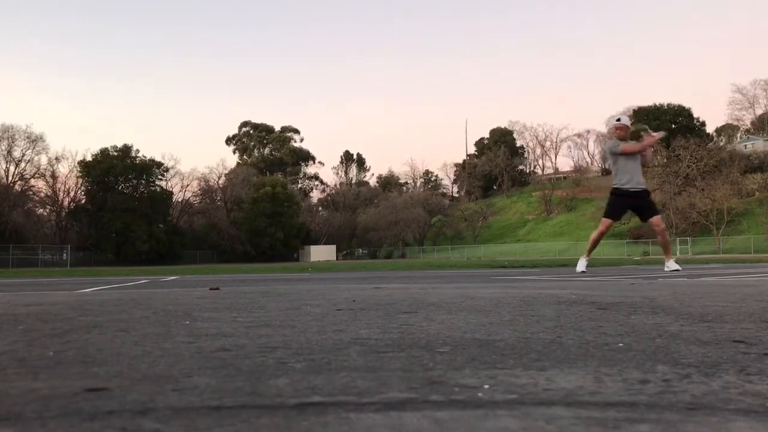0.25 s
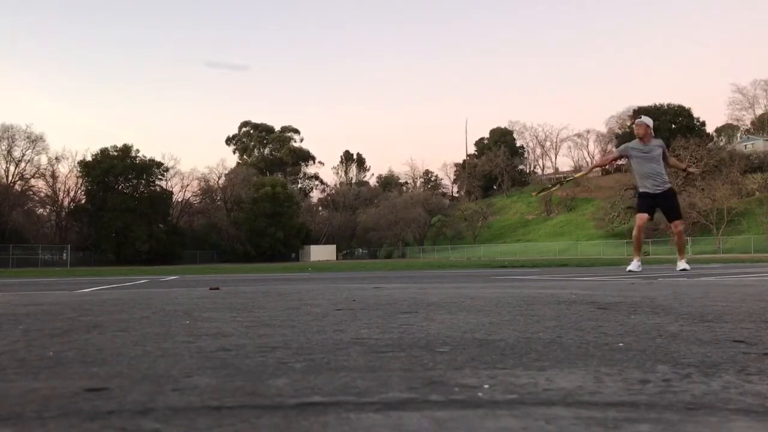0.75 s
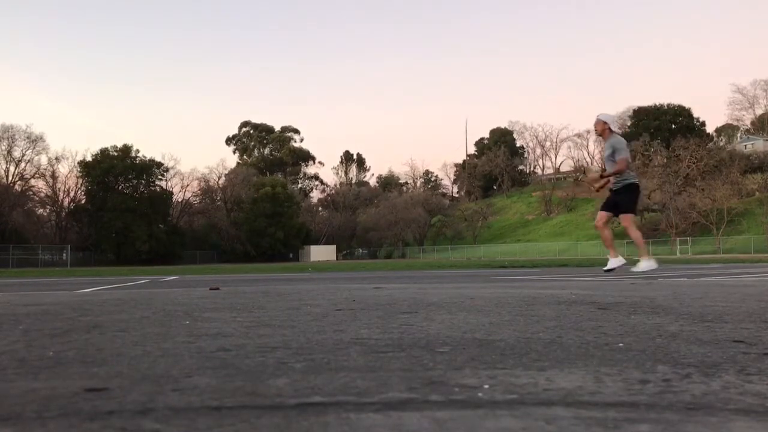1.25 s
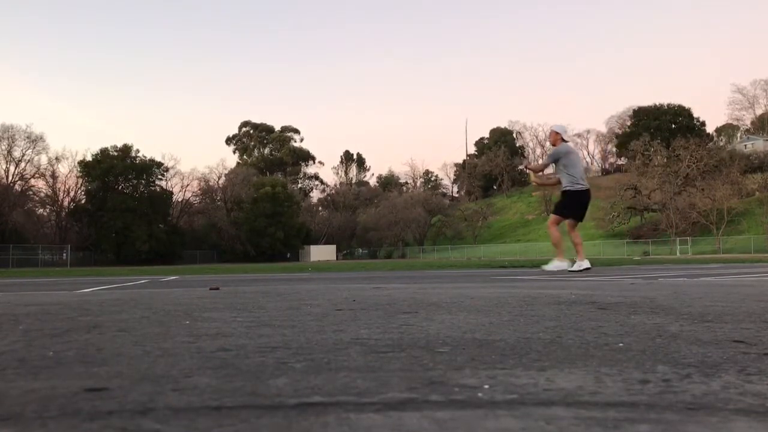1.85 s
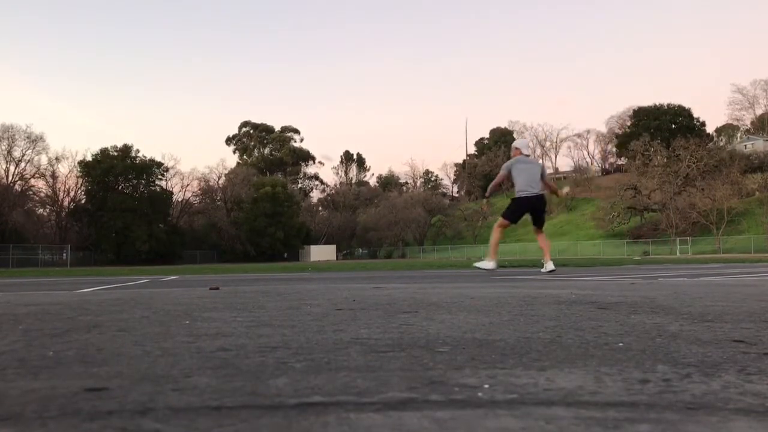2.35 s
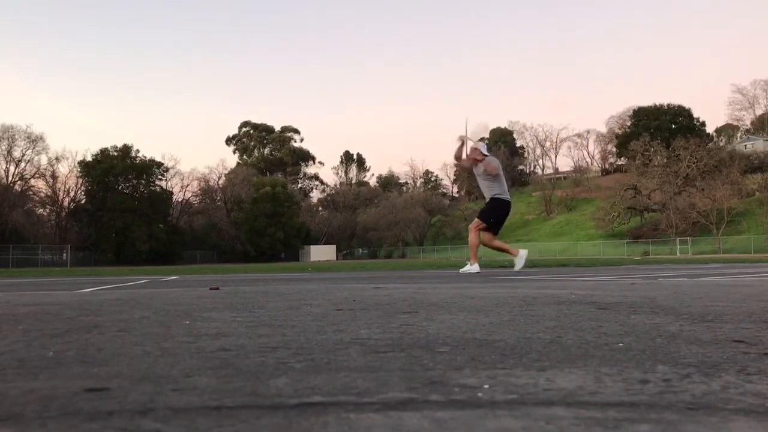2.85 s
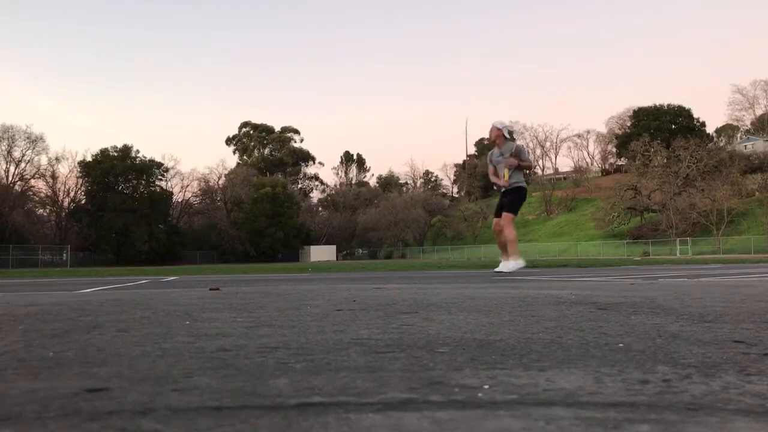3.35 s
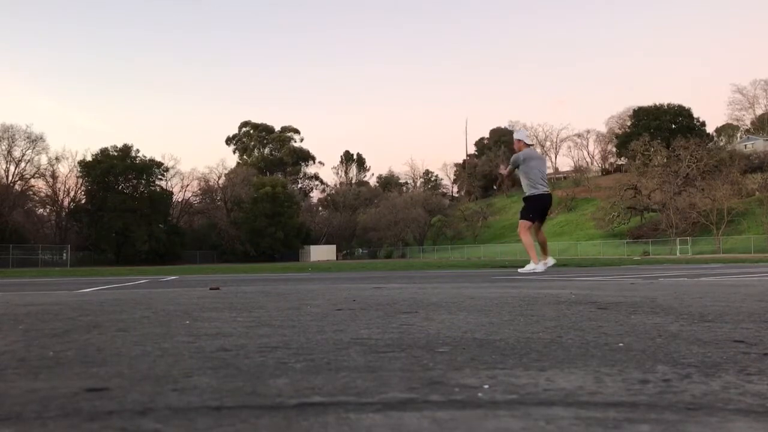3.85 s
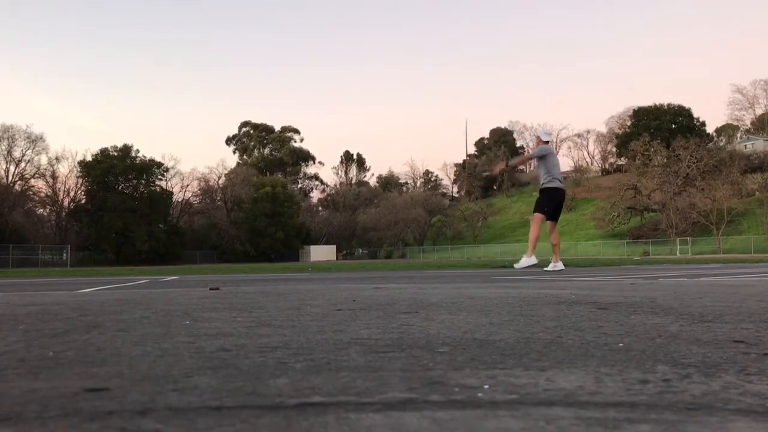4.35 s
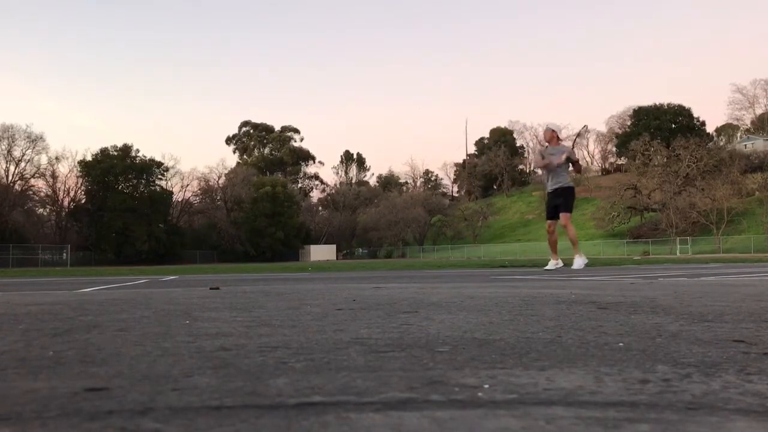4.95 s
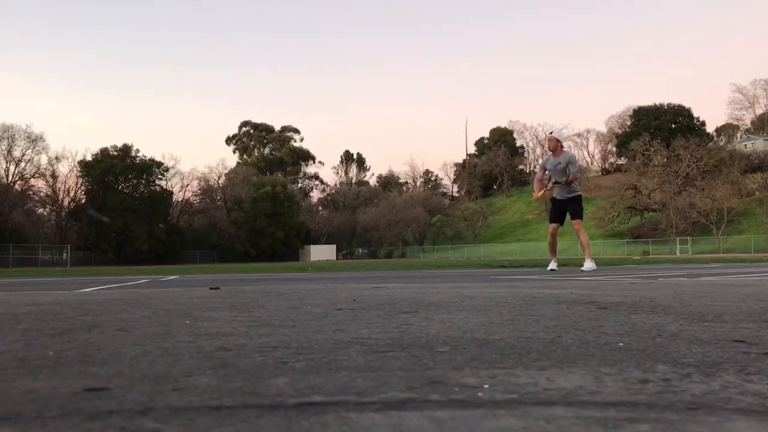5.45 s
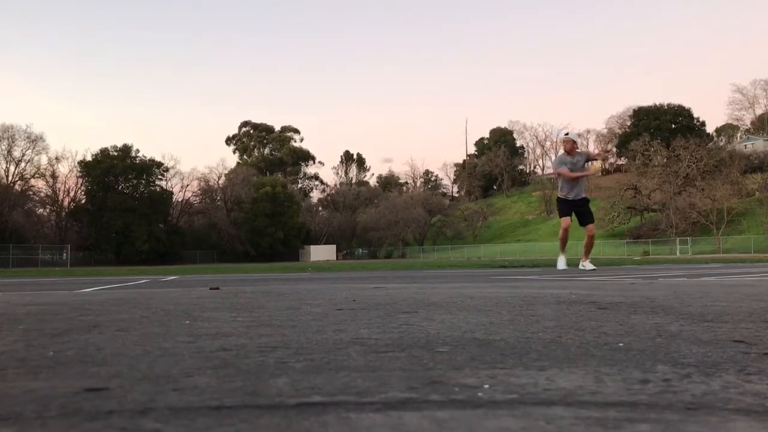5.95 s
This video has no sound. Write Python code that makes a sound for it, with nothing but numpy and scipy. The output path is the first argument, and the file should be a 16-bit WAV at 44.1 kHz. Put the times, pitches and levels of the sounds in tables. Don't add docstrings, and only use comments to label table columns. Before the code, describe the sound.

A quiet open-air court with low distant road drone, faintly stirring leaves and slight hiss, heard in mono from the ground near a practice wall. At 0.3 s a ball bounces crisply on asphalt; shoes scuff grit, and at 0.63 s a racket hits with a bright string crackle and soft hollow pock. At 1.3 s the ball slams the hollow wall: a hard crack, deep falling thump, ringing panel, rumble and fence slaps. It bounces at 1.75 s with a quick slap, then light steps follow. The loudest stroke comes at 2.76 s, and the brightest, loudest wall boom at 3.23 s, tight and knocky. Soles drag; a faint bounce at 4.0 s, a duller hollow stroke at 4.5 s, then a darker, boomy wall hit at 5.04 s. Rumble fades before a clear bounce at 5.68 s and final gritty scuffs around 5.9 and 6.15 s.

```python
import sys
import numpy as np
from scipy import signal
from scipy.io import wavfile
from scipy.ndimage import uniform_filter1d

SR = 44100
rng = np.random.default_rng(int(sys.argv[2]) if len(sys.argv) > 2 else 0)


def voltage_ratio(decibels):
    exponent = np.asarray(decibels, float) / 20
    return 10 ** exponent


def inscribe(sig):
    pcm = np.round(np.clip(np.atleast_2d(sig).T, -1, 1) * 32767)
    wavfile.write(sys.argv[1], SR, pcm.astype(np.int16))


N = 273283


def evened(x):
    return x / np.sqrt(np.mean(x ** 2) + 1e-20)


def read(points, hz):
    f, value = np.transpose(points)
    return np.interp(np.log(hz + 1), np.log(f + 1), value)


def add(mix, s, sound):
    part = mix[round(s * SR):][:len(sound)]
    part += sound[:len(part)]


def lowpass(x, top_hz, order=2):
    return signal.lfilter(*signal.butter(order, top_hz, fs=SR), x)


def resonate(x, hz, width):
    return signal.lfilter(*signal.iirpeak(hz, hz / width, SR), x)


def ring(t, hz, db, t60, rise=0.0003):
    t = np.maximum(t, 0)
    return voltage_ratio(db - 60 * t / t60) * (1 - np.exp(-t / rise)) * np.sin(2 * np.pi * hz * t)


def tick(t, hz, db, length):
    puff = rng.standard_normal(len(t)) * np.exp(-t / length)
    puff[0] -= 3.0
    coloured = resonate(puff, hz, 0.9 * hz)
    return voltage_ratio(db) * coloured / abs(coloured).max()


def noise(length, db_of, size=512):
    hop = size // 4
    frames = length // hop + 6
    hz = np.fft.rfftfreq(size, 1 / SR)[:, None]
    a, b = rng.standard_normal((frames, len(hz), 2)).T
    z = (a + 1j * b) * voltage_ratio(db_of(hz, np.arange(frames) * hop / SR))
    return signal.istft(z, nperseg=size, noverlap=size - hop)[1][:length]


def echoed(x, echoes):
    out = x.copy()
    for delay, db, top_hz in echoes:
        add(out, delay, voltage_ratio(db) * lowpass(x, top_hz))
    return out


def trees(t):
    rest_db, earlier_hit_db = -20.5, 9.5
    rise_s, fall_db_per_s = 0.11, 34
    power = voltage_ratio(rest_db) ** 2 + voltage_ratio(earlier_hit_db - fall_db_per_s * t) ** 2
    for rows, db in (WALL_HITS, 24), (STROKES, 2.5), (BOUNCES, -3.5):
        for s, *_ in rows:
            after = np.maximum(t - s, 0)
            swell = np.minimum(after / rise_s, 1)
            power = power + (voltage_ratio(db - fall_db_per_s * after) * swell) ** 2
    return 10 * np.log10(power)


# f/Hz, level/dB per Hz
ROAD = [(25, -14.5), (55, -0.5), (85, -2), (125, 0), (180, -8), (260, -8.5), (420, -18), (650, -14.5),
        (1000, -11.5), (1400, -13), (1750, -22), (2100, -29), (2700, -38.5), (4000, -48.5), (7000, -85.5)]
# t/s, level/dB
ROAD_LEVEL = [(0.0, -41.5), (2.5, -42.5), (4.4, -43), (6.2, -44.5)]


def road():
    patch_db, duck_db, duck_s = 1.6, 0.5, 0.265
    patches = rng.standard_normal((N // 512 + 6, 1025)).T
    patches = evened(uniform_filter1d(uniform_filter1d(patches, 12, 0), 8, 1))

    def colour(hz, t):
        air_loss = 12 * np.maximum(np.log2((hz + 1) / 7000), 0)
        leaves = np.exp(-np.log((hz + 1) / 4450.0) ** 2 / 0.3)
        return read(ROAD, hz) - air_loss + patch_db * patches + leaves * trees(t)

    hum = noise(N, colour, size=2048)
    t = np.arange(N) / SR
    sunk_db = sum(duck_db * (t > hit) * np.exp(-abs(t - hit) / duck_s) for hit, *_ in WALL_HITS)
    s, level_db = np.transpose(ROAD_LEVEL)
    return evened(hum) * voltage_ratio(np.interp(t, s, level_db) - sunk_db - 1.5)


# t/s, level/dB, colour f/Hz
TICKS = [(.023, -57, 4970), (.39, -43.5, 2580), (0.578, -33.5, 1000), (0.587, -32, 1290), (.705, -46, 5560),
         (.733, -34, 1050), (.772, -49, 5060), (.815, -43, 6650), (0.914, -56, 4500), (1.0875, -33.5, 1510),
         (1.13, -58, 5500), (1.3067, -24, 5130), (2.0145, -34, 1000), (3.812, -38, 289), (3.81, -46, 2560),
         (3.661, -35, 1100), (1.345, -46.5, 5500), (1.198, -61, 6000), (3.695, -56, 8500),
         (4.529, -50, 7000), (2.396, -59, 5460), (2.795, -68, 10000), (3.039, -47, 3200),
         (3.237, -30, 4500), (4.161, -59.5, 4950), (4.222, -34, 9600), (4.224, -33.5, 8900),
         (4.64, -59, 6000), (5.0465, -39, 6000), (6.0, -58, 6860)]


def knock(db, hz):
    t = np.arange(SR // 20) / SR
    body = resonate(tick(t, hz, 0, 2.5 / hz), hz, 0.7 * hz)
    body = lowpass(body, min(1.3 * hz, 16000), order=4)
    return voltage_ratio(db + 1.5) * body / abs(body).max()


# f/Hz, level/dB per Hz
SOLE = [(1000, 15.5), (2000, 13.5), (3000, 11.5), (4200, 17), (6500, 13.5), (10000, 4.5), (13000, 9.5),
        (16000, 1.5)]


def scuff(length_s, shape_db, treble_db):
    grip_s, release_s = 0.003, 0.011
    length = round(length_s * SR)

    def colour(hz, t):
        treble = np.clip(np.log2((hz + 1) / 3260.0) / 0.82, 0, 1)
        return read(SOLE, hz) + treble * treble_db + 0 * t

    grit = noise(length, colour, size=256)
    grains = voltage_ratio(2.0 * evened(uniform_filter1d(rng.standard_normal(length), 60)))
    grains *= voltage_ratio(1.6 * evened(uniform_filter1d(rng.standard_normal(length), 350)))
    t = np.arange(length) / SR
    edges = np.minimum(t / grip_s, 1) * np.minimum(t[::-1] / release_s, 1) ** 2
    return evened(grit * grains) * voltage_ratio(shape_db(np.arange(length) / length)) * edges


# centre t/s,
# length t/s, level/dB, treble level/dB against it
STEPS = [(0.257, 0.028, -69, 0), (0.447, 0.061, -72, 10), (0.808, 0.046, -57.5, -4),
         (0.909, 0.14, -60, -16.5), (1.025, 0.24, -65, -18), (4.932, 0.31, -66.5, -16),
         (3.658, 0.054, -58, -21), (1.596, 0.041, -60, 6), (2.073, 0.036, -65, 1), (2.173, 0.06, -62, -8),
         (2.301, .02, -50.5, -2), (2.523, 0.039, -56, -1), (2.617, 0.035, -73, 0), (2.907, 0.05, -72, 8),
         (3.171, 0.13, -58.5, -9.5), (4.015, 0.037, -60, -2), (4.66, 0.046, -62, -3),
         (4.697, .025, -63, -9), (4.737, 0.031, -52.5, 3), (6.149, 0.029, -46.5, 0.5)]


def step(centre, length_s, db, treble_db):
    arch_db = 15
    lean = 0.8
    span = 1.4 * length_s
    sound = scuff(span, lambda u: db - 2 * arch_db * (2 * u ** lean - 1) ** 2, treble_db)
    return centre - span * 0.5 ** (1 / lean), sound


# t/s, tick level/dB, ring level/dB, ring f/Hz, thud level/dB
BOUNCES = [
    (0.2912, -19, -28.5, 1000, -31),
    (1.7455, -25.5, -30.5, 1000, -31),
    (1.7599, -33, -34, 1000, -38),
    (4.0118, -29, -32, 1000, -38.5),
    (4.037, -40, -37, 1000, -60),
    (5.6785, -25.5, -25.5, 1036, -33),
    (5.6999, -36, -42, 990, -52),
]


def bounce(tick_db, ring_db, ring_hz, thud_db):
    t = np.arange(SR // 8) / SR
    thud = voltage_ratio(thud_db) * np.sin(2 * np.pi * 260 * t) * np.exp(-((t - 0.004) / 0.0033) ** 2)
    felt = tick(t, 1700, tick_db - 24.5, 0.0022) + tick(t, 1100, tick_db + 0.54, 0.00015)
    ball = ring(t, ring_hz, ring_db, 0.025)
    wire = ring(t - 0.015, 4250, tick_db - 45, 0.19, 0.005)
    return lowpass(felt, 6500) + ball + thud + wire


# start t/s, length t/s, first level/dB, last level/dB, treble level/dB against it
DRAGS = [(.516, 0.13, -57.5, -43, -2), (0.627, 0.099, -44, -78, -8), (0.701, 0.054, -50, -79, 1),
         (1.358, .046, -48, -37, -9), (3.033, 0.086, -53.5, -63.5, -2), (3.493, 0.063, -54, -53.5, 2),
         (3.551, 0.094, -62, -71, 1), (4.213, 0.19, -53.5, -50.5, 2), (4.762, 0.085, -60, -66.5, 2),
         (5.636, 0.051, -54, -68, -14), (5.87, 0.045, -68.5, -51.5, -2.5)]


def drag(start, length_s, first_db, last_db, treble_db):
    return start, scuff(length_s, lambda u: first_db + (last_db - first_db) * u, treble_db)


def swish(contact_s, ball_db):
    length_s, rise_db, top_db = 0.065, 21, ball_db - 38
    return drag(contact_s - length_s, length_s, top_db - rise_db, top_db, -10)


# t/s, string crack level/dB, ball ring level/dB, ball ring f/Hz, crack brightness level/dB
STROKES = [
    (0.6281, -34, -22.5, 1000, 34),
    (2.764, -29, -16, 1003, 19),
    (4.5004, -35.5, -17.5, 990, -2),
]
# f/Hz, width f/Hz, level/dB, share of brightness
STRING_CRACK = [(614, 450, 10.5, 0.74), (1120, 290, -1, 0.58), (1800, 63, 0, 0), (3600, 85, -10, 0.86),
                (4420, 440, -4.5, 1), (5500, 2900, -5, 0.74), (13200, 2300, -17, 0.75)]
# delay t/s, level/dB, top f/Hz
STROKE_ECHOES = [
    (0.0264, -15.5, 2500),
    (.092, -19.5, 1200),
]


def racket(crack_db, ball_db, ball_hz, bright_db):
    t = np.arange(SR // 4) / SR
    contact = rng.standard_normal(len(t)) * np.minimum(t / 0.0002, 1) * np.exp(-(t / 0.005) ** 2)
    crack = np.zeros(len(t))
    for hz, width, db, share in STRING_CRACK:
        string = resonate(resonate(contact, hz, width), hz, 2 * width)
        crack += voltage_ratio(db + share * bright_db) * evened(string)
    crack *= voltage_ratio(crack_db + 12.5) / abs(crack).max()

    push = voltage_ratio(-8.5 + 0.35 * crack_db) * np.sin(2 * np.pi * 270 * (t - 0.0012))
    push *= np.exp(-((t - 0.0036) / 0.0024) ** 2)

    ball = ring(t - 0.0045, ball_hz, ball_db + 12.0, 0.016, 0.0014)
    ball += ring(t - 0.0045, 0.85 * ball_hz, ball_db - 19, 0.014, 0.002)
    frame = ring(t - 0.001, 614, ball_db - 5 - 0.058 * bright_db ** 2, 0.022, 0.0011)

    string_db = ball_db - 23.5
    strings = ring(t, 2350, string_db, 0.13 - 0.0022 * bright_db)
    strings += ring(t, 2255, string_db - 8 + 0.42 * bright_db, 0.075)

    spill = evened(resonate(rng.standard_normal(len(t)), 1700, 3400))
    spill *= voltage_ratio(crack_db - 14.5 - 60 * t / 0.1)
    return echoed(crack + push + ball + frame + strings, STROKE_ECHOES) + lowpass(spill, 4700)


def wake(contact_s, ball_db):
    length_s, fall_db, first_db = 0.11, 7, ball_db - 42.5
    return drag(contact_s + 0.031, length_s, first_db, first_db - fall_db, -12)


# t/s, crack level/dB, crack colour f/Hz, thump level/dB, settled thump f/Hz
WALL_HITS = [
    (1.2999, -8.5, 5360, -7, 96),
    (3.2273, -7.5, 6880, -4.5, 143.6),
    (5.0384, -8, 4100, -5, 127),
]
# f/Hz, level/dB, t60 t/s
PANELS = [
    [(94.8, -21, 0.62), (132, -18, 0.22), (221, -28.5, 0.32), (250.3, -23, 0.24), (309, -28.5, 0.25),
     (367.5, -22.5, 0.14), (500, -26.5, 0.15), (796, -27.5, 0.09), (1000, -18, 0.015)],
    [(66, -24.5, 0.73), (158, -30.5, 0.11), (203, -22, 0.045), (258.6, -17.5, 0.27), (298, -19.5, 0.13),
     (380, -19, 0.05), (499, -16.5, 0.043), (650, -17, 0.0443), (838, -13, 0.036), (974, -16.5, 0.034),
     (2100, -29.5, 0.045)],
    [(76.7, -12, 0.27), (126, -16, 0.15), (179, -17.5, 0.2), (224, -16, 0.087), (355, -13.5, 0.044),
     (397, -23, 0.081), (507, -22.5, 0.084), (750, -19, 0.043), (1140, -9, 0.0078), (1720, -27, 0.014),
     (2490, -25, 0.053), (7100, -28, 0.01)],
]
# f/Hz, level/dB per Hz
BOOM = [(30, -33), (70, -1), (150, -0.5), (260, -9.5), (450, -16), (1000, -9), (2500, -30.5), (5000, -55.5),
        (9000, -46), (16000, -80)]
# f/Hz, t60 t/s
BOOM_DECAY = [(50, 1), (150, 1.42), (400, 0.66), (1200, 0.1), (4000, 0.67), (12000, 0.22)]
# delay t/s, level/dB, top f/Hz
WALL_ECHOES = [
    (0.0606, -12, 9000),
    (0.084, -24, 7100),
    (.115, -25, 493),
    (0.151, -34, 6000),
    (.181, -20.5, 5200),
    (0.244, -26.5, 500),
]


def wall(crack_db, crack_hz, thump_db, settle_hz, modes):
    t = np.arange(SR) / SR
    slap = ring(t, 2780, crack_db + 4.0, 0.0028, 0.00005)
    slap -= ring(t, crack_hz, crack_db + 9.5, 0.00075, 0.00005)
    slap += tick(t, 6880, crack_db - 4.5, 0.00035)
    crack = lowpass(slap, 8800, order=8)
    crack += ring(t - 0.0002, 1470, crack_db + 8.5, 0.0028, 0.0001)
    crack += tick(t, 13000, crack_db - 33.5, 0.002)

    ground = evened(resonate(rng.standard_normal(SR), 2000, 2800))
    chatter = evened(resonate(rng.standard_normal(SR), 1500, 2500))
    scatter = voltage_ratio(crack_db - 38.0 - 60 * t / 0.16) * ground
    scatter += voltage_ratio(crack_db - 26 - 60 * t / 0.089) * chatter

    after = np.maximum(t - 0.0011, 0)
    turns = settle_hz * after + 130 * 0.003 * (1 - np.exp(-after / 0.0013))
    thump = voltage_ratio(thump_db - 60 * after / 0.059) * np.sin(2 * np.pi * turns)

    panel = np.zeros(SR)
    for hz, db, t60 in modes:
        panel += ring(t - 0.0009 - 0.055 / hz, hz, db, t60, 0.37 / hz)

    rumble = noise(SR, lambda hz, s: read(BOOM, hz) - 60 * s / read(BOOM_DECAY, hz), size=1024)
    rumble *= voltage_ratio(thump_db - 11.5 - 11.0) / np.std(rumble[:SR // 10])
    rumble *= 1 - np.exp(-t / 0.0022)

    smear = rng.standard_normal(200) * np.exp(-t[:200] / 0.0018)
    smear /= np.linalg.norm(smear)
    blurred = voltage_ratio(-7.5) * signal.oaconvolve(crack + scatter, smear)[:SR]
    returned = echoed(blurred + thump, WALL_ECHOES) - blurred
    return returned + crack + scatter + panel + rumble


def scene():
    mix = road()
    for s, db, hz in TICKS:
        add(mix, s, knock(db, hz))
    for row in STEPS:
        add(mix, *step(*row))
    for s, *blow in BOUNCES:
        add(mix, s, bounce(*blow))
    for row in DRAGS:
        add(mix, *drag(*row))
    for s, *blow in STROKES:
        ball_db = blow[1]
        add(mix, *swish(s, ball_db))
        add(mix, s, racket(*blow))
        add(mix, *wake(s, ball_db))
    for (s, *blow), modes in zip(WALL_HITS, PANELS):
        add(mix, s, wall(*blow, modes))
    return mix[None]


def roll_off(x):
    return signal.sosfilt(signal.butter(12, 16630, fs=SR, output="sos"), x)


# f/Hz, level/dB per Hz
HISS = [(3000, 8), (6000, 3), (9000, -1.5), (10500, -3.5), (12000, 1.5), (15500, -3), (16000, -29)]


def record(dry):
    lost_hz, lost_top_db = (2570, 2990), -55
    hiss_db, held_hiss_db, hold_s = -75.5, 10.5, 0.4
    x = signal.sosfilt(signal.butter(3, 55, "high", fs=SR, output="sos"), dry[0])

    band = signal.oaconvolve(x, signal.firwin(2047, lost_hz, pass_zero=False, fs=SR), "same")
    band_rms = np.sqrt(abs(uniform_filter1d(band ** 2, 1500)) + 1e-14)
    lost = uniform_filter1d(np.maximum(1 - voltage_ratio(lost_top_db) / band_rms, 0), 500)

    booming = np.cumsum(abs(lowpass(x, 300)) > 0.2)
    hold = round(hold_s * SR)
    earlier = np.r_[np.zeros(hold), booming[:-hold]]
    held = uniform_filter1d(1.0 * (booming > earlier), 300)
    hiss = evened(noise(N, lambda hz, t: read(HISS, hz) + 0 * t))
    hiss *= voltage_ratio(hiss_db + held_hiss_db * held)

    x = signal.oaconvolve(x - lost * band + hiss, signal.firwin(101, 16000, fs=SR), "same")
    return roll_off(x[None])


dry = scene()
out = record(dry)
inscribe(out)
```